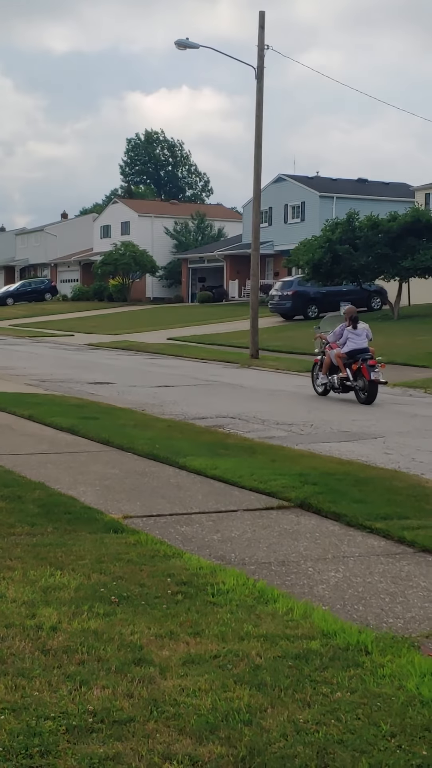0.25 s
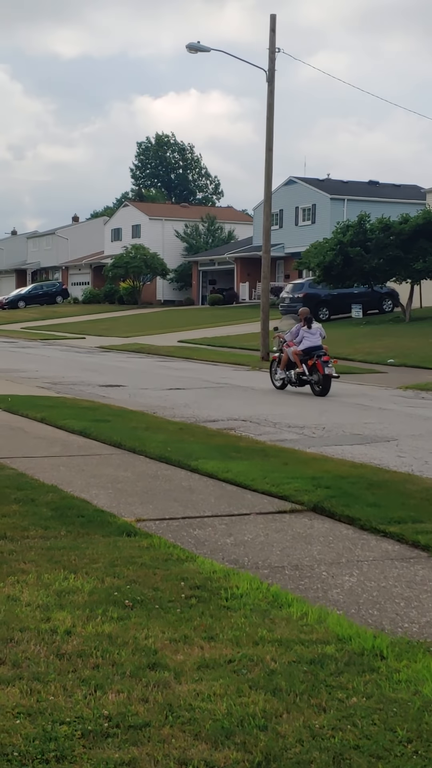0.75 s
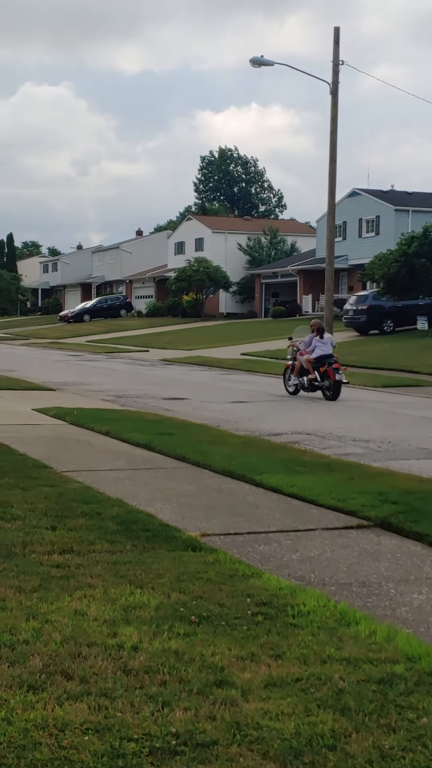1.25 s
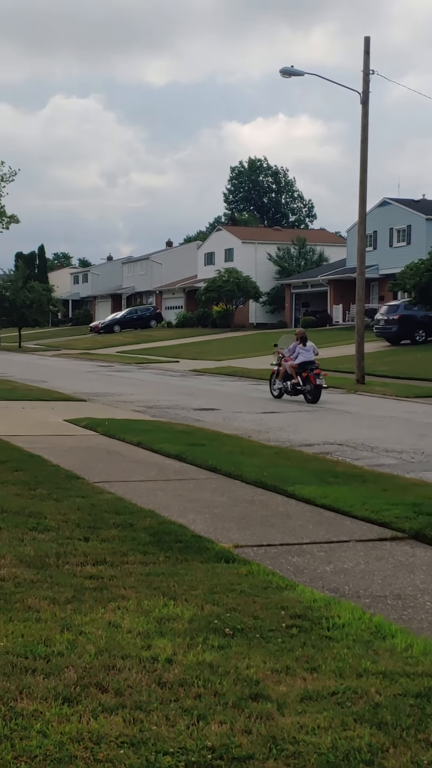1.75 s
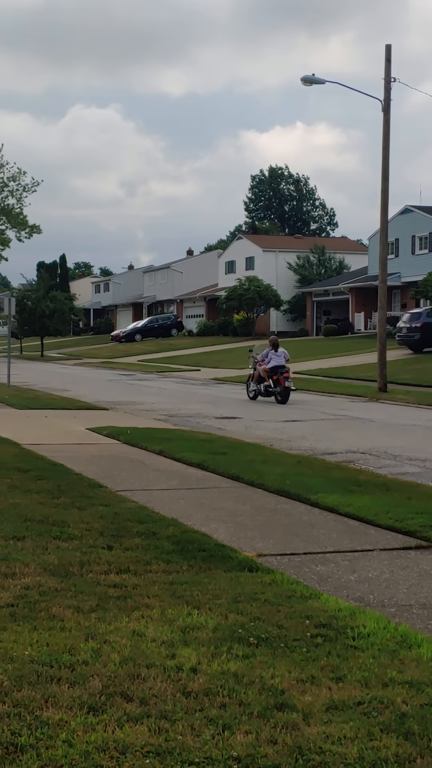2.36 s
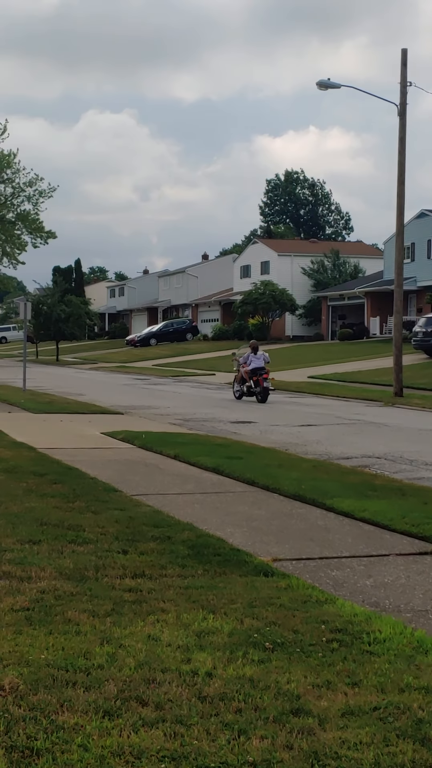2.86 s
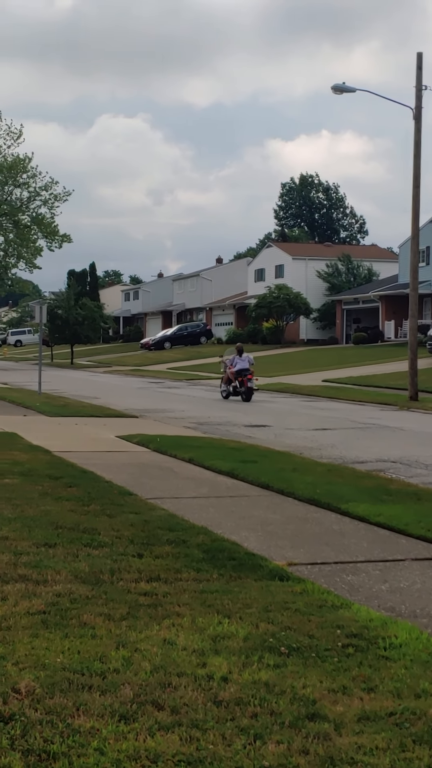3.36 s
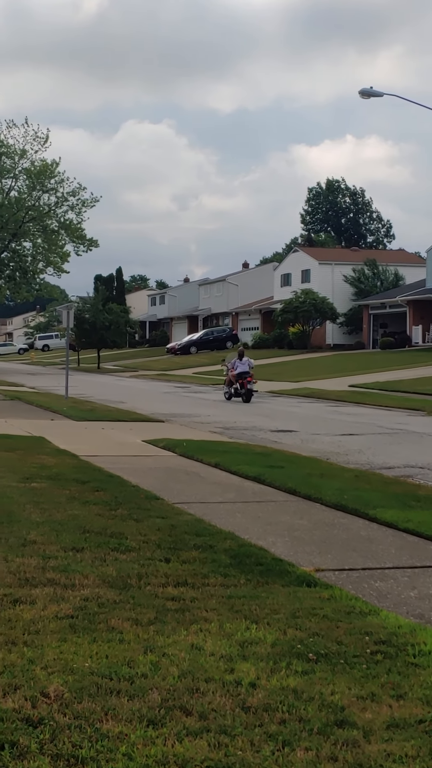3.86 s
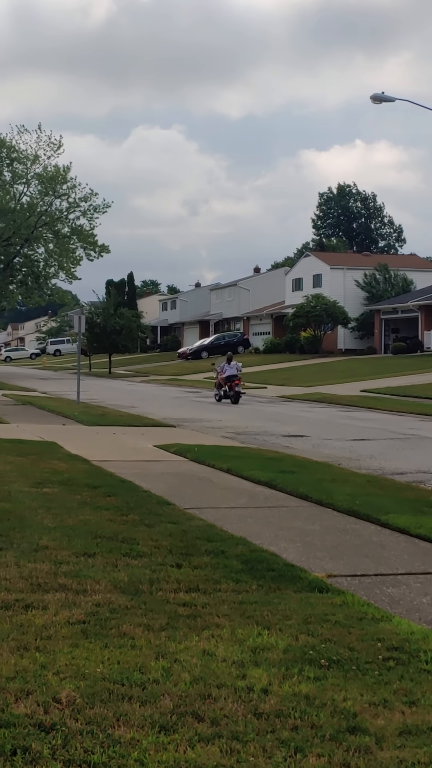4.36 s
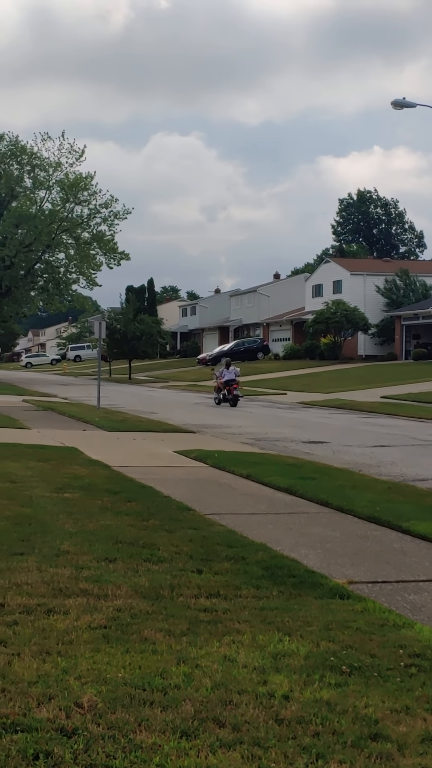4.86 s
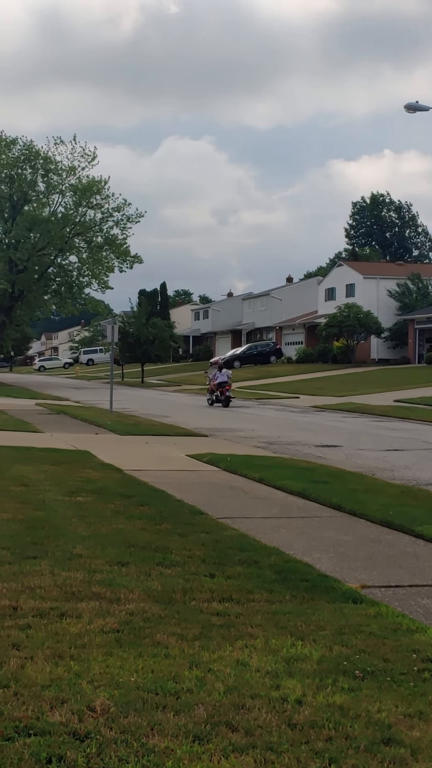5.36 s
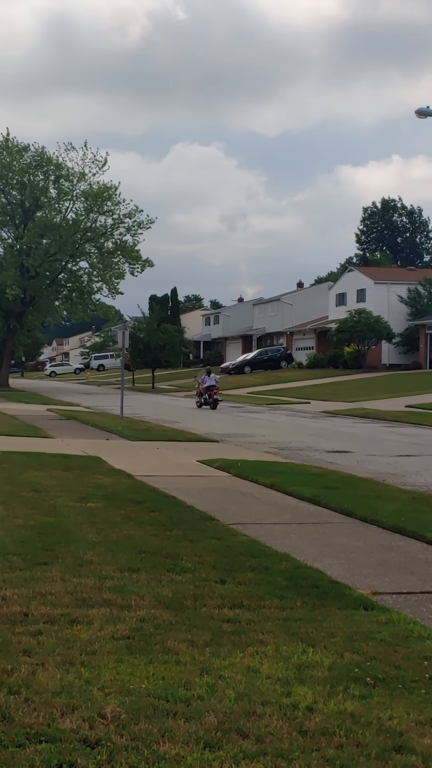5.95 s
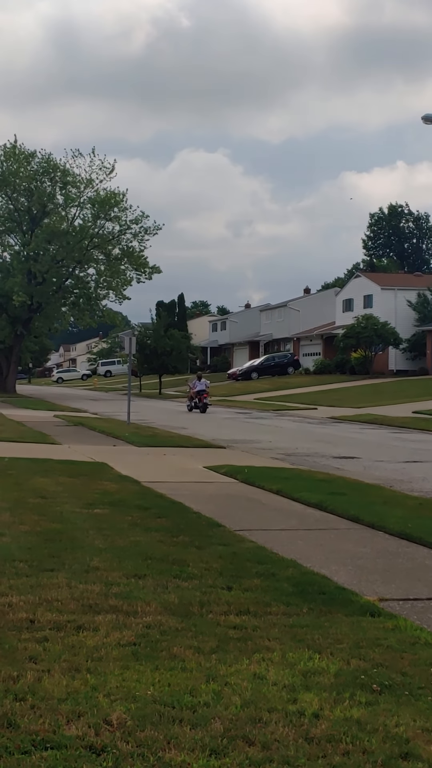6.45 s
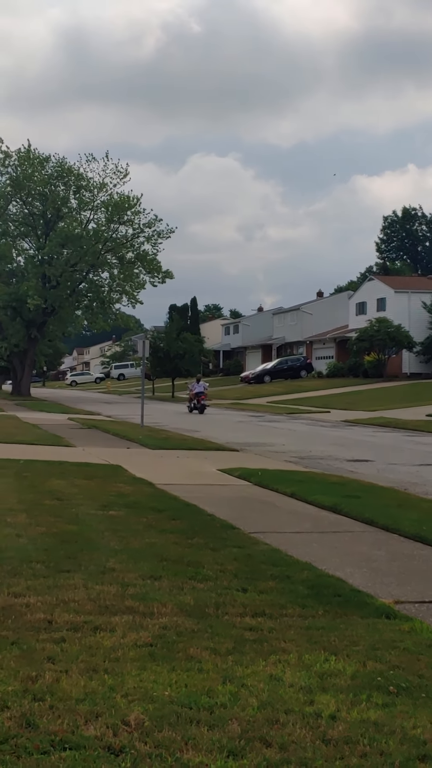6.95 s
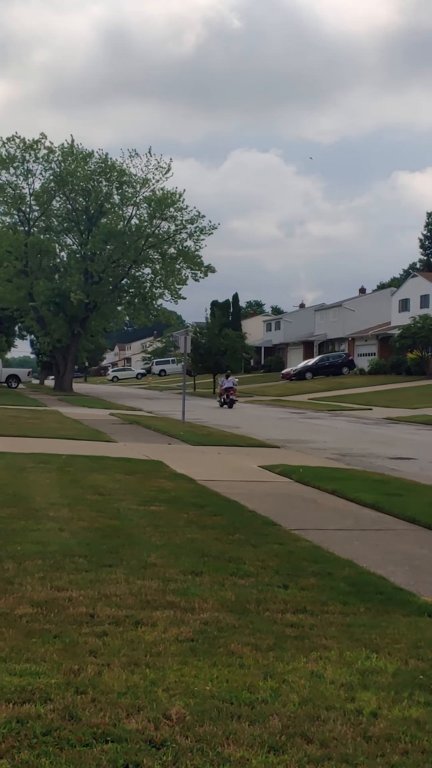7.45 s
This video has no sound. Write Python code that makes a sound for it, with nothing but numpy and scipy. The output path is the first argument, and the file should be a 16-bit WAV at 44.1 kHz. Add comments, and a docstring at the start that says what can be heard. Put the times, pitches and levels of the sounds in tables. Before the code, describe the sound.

A big twin-cylinder motorcycle chugs away down a suburban street, its uneven thump echoing off houses while wind buffets and slaps the microphone.

```python
"""A V-twin motorcycle chugs away down a quiet street: two uneven firings a cycle excite decaying pipe modes,
and bursts of gas noise crack at the pipe mouths. Two house fronts return delayed, dulled copies with
shrinking lags, and scattered late reflections form a noise-built tail. Wind buffets two microphone ports,
mostly the left: shaped noise rumbles and flutters, single slaps are short falling tones. Tyres, engine
whir and town hiss as flickering bands of noise; a few far birds chirp as bent whistles."""
import sys
import numpy as np
from scipy import signal
from scipy.fft import rfft, irfft
from scipy.io import wavfile
from scipy.ndimage import uniform_filter1d

SR = 44100
rng = np.random.default_rng(int(sys.argv[2]) if len(sys.argv) > 2 else 0)


def file_out(sig):
    """Save sig as 16-bit WAV at sys.argv[1]."""
    # one column per channel
    cols = np.atleast_2d(sig).T
    # limit, then scale
    lim = np.clip(cols, -1, 1)
    pcm = np.round(lim * 32767).astype(np.int16)
    wavfile.write(sys.argv[1], SR, pcm)


N = 340011

# Four-stroke cycle rate as heard: t/s, rate/(cycles/s)
CYCLE_RATE = [(0, 10.42), (.3, 10.441), (1.1, 10.785), (2.3, 10.924), (2.6, 10.858), (4, 10.881),
              (4.2, 10.968), (4.9, 11.005), (5.35, 11.169), (5.5, 10.917), (6.7, 10.656), (7.71, 10.568)]
# Engine load: t/s, throttle/(0 to 1), swell of the crack/dB
THROTTLE = [(0, 0.44, -4.5), (.6, 0.32, -1), (1.5, 0.56, 4), (2.1, 0.46, 1.5), (2.5, 0.51, 6),
            (3.4, 0.44, -1.5), (4, 0.73, 6.5), (4.5, 0.91, 4.5), (5.1, 0.85, 1.5), (5.5, 0.66, 5.5),
            (6, 0.57, 1), (6.5, 0.54, 7), (7, 0.39, -0.5), (7.71, 0.83, 4.5)]
# Pipe modes: firing place/cycle, f/Hz, t60/s, relative push (negative where the wave leaves as a dip)
PIPE_MODES = [(-.035, 104.3, .35, -.4), (-.031, 168.6, .075, 1.76), (-.048, 188.8, .105, 1.2),
              (0, 62, .13, .9), (-.018, 326, .037, -.63), (-.016, 245, .126, .17), (.554, 82, .079, -3.1),
              (.551, 196.6, .21, .35), (.545, 56.7, .033, 4.8), (.546, 283.5, .051, -.52),
              (.565, 217, .065, -.6)]
# Gas puffs at the pipe mouths: place/cycle, relative level/dB, decay constant/ms, cutoff f/Hz
GAS_PUFFS = [(-.014, -1, 2.2, 14000), (0, -3, 4.5, 2500), (.04, -12.5, 4, 7000), (.12, -17, 5, 7000),
             (.39, -20, 6, 9000), (.582, -7, 3, 4500), (.73, -11, 3, 4000), (.88, -19, 4, 4000)]
# Colour of the crack: f/Hz, relative level/dB
CRACK_COLOUR = [(300, -15.5), (900, -1), (1600, -15.5), (2470, -11), (3300, -16.5), (5000, -10),
                (6500, -16), (8000, -22.5), (10700, -27.5), (12400, -34)]
# Colour of the thump: f/Hz, gain/dB
THUMP_COLOUR = [(22, -34), (34, -11), (46, 3), (210, -2), (300, -5), (370, -5), (430, -16), (700, -37),
                (1500, -71.5)]
# Bands of the crack: tilt/(share of the treble fade), lower f/Hz, upper f/Hz
CRACK_BANDS = [(-.3, 950, 1900), (-.7, 1900, 3000), (-.1, 3000, 4400), (.5, 4400, 6800), (1, 6800, 15000)]
# House fronts: t/s, far lag/ms, far level/dB, near lag/ms, near level/dB
HOUSE_FRONTS = [(0, 94, -24, 53, -26), (.9, 87.5, -17, 49, -22), (1.4, 84, -8, 47, -22),
                (1.8, 82.3, -3.5, 45, -20), (2.3, 79, -1.5, 42, -18), (2.8, 76, -1, 39, -16),
                (3.8, 73.5, -3, 38, -10), (5.2, 70, -5, 34.1, -10), (7.1, 66, -9, 28, -12),
                (7.7, 64, -9, 27, -12)]
# Dulling by walls and shrubs: f/Hz, gain/dB
FRONT_COLOUR = [(220, 0), (350, -6), (800, -11), (2500, -8), (10000, -16)]
# Colour of the late reflections: f/Hz, relative level/dB
TAIL_COLOUR = [(60, -6.5), (250, -1.5), (500, 7.5), (900, 6.5), (2500, 4.0), (12000, -14.0)]
# Colour of the hiss: f/Hz, relative level/dB
HISS_COLOUR = [(250, -6), (450, -9.5), (680, -12.5), (850, -12.5), (1300, -17.5), (1800, -19),
               (2400, -24.5), (3100, -31.5), (4000, -24.5), (5000, -30.5), (5800, -40), (6600, -28.5),
               (7700, -52), (9000, -45.5), (11000, -47.5), (12400, -53.5)]
# Wind rumble at the left port, before the buffets: t/s, level/dB
WIND_LEFT = [(0, -20.5), (.8, -32), (1.25, -45), (1.55, -28.5), (1.95, -33), (2.2, -43), (2.65, -36),
             (2.85, -20), (3.7, -16.5), (4.6, -22.5), (5.3, -24), (5.45, -20.5), (5.9, -11.5), (6.6, -14.5),
             (6.74, -16), (6.78, -30), (7.1, -39), (7.55, -24.5), (7.71, -32)]
# Wind rumble at the right port: t/s, level/dB
WIND_RIGHT = [(0, -33), (1, -52), (2.6, -42), (2.95, -26), (3.15, -11.5), (3.35, -21.5), (3.6, -26.5),
              (3.9, -16), (4.25, -23), (4.6, -23), (5.3, -29.5), (5.55, -22), (5.9, -28), (6.3, -15),
              (6.75, -18), (7, -28), (7.5, -29), (7.71, -38)]
# Buffets that swell the left rumble: start t/s, peak level/dB, hold/s
BUFFETS = [(2.874, -13.5, 0.045), (3.09, -15.5, 0.11), (3.582, -11, 0.13), (3.727, -10, 0.066),
           (4.051, -8, 0.032), (4.851, -11, 0.024), (5.388, -15.5, 0.11), (5.737, -15, 0.13),
           (5.991, -14, 0.12), (6.266, -21, 0.085), (6.436, -14, 0.064), (6.627, -8, 0.09)]
# Eddies that slap a port: t/s, peak level/dB, time scale/ms, starting f/Hz, port (0 left, 1 right)
SLAPS = [(3.012, -14.5, 14, 203, 1), (3.127, -11, 16, 150, 0), (3.13, -10, 12, 120, 1),
         (3.169, -6, 9.1, 85, 0), (3.33, -13, 9.7, 110, 1), (3.413, -3.5, 13.5, 100, 0),
         (3.432, -9, 6.7, 262, 0), (3.585, -11.5, 6, 220, 0), (3.611, -10, 7.4, 230, 0),
         (3.622, -5, 8.3, 75, 0), (3.654, 0, 10.3, 90, 0), (3.698, -7, 12, 120, 0),
         (3.764, -2.5, 15, 75, 0), (3.946, -1.5, 13.3, 85, 0), (4.057, -14, 12, 90, 0),
         (4.088, -5.5, 15, 130, 0), (4.292, -9, 10.3, 170, 0), (4.428, -1.5, 15, 70, 0),
         (4.867, -10, 20, 130, 0), (5.682, -4, 6.8, 190, 0), (5.712, -1.5, 15, 65, 0),
         (5.755, 0, 6.7, 210, 0), (5.782, -3, 9.2, 260, 0), (5.824, -8, 7.2, 180, 0),
         (5.855, -9.5, 8.4, 300, 0), (5.866, -2.5, 8.8, 260, 0), (5.892, -12.5, 10, 230, 0),
         (5.933, -5.5, 10, 260, 0), (6.005, -11, 2.8, 350, 0), (6.013, -0.5, 17, 75, 0),
         (6.031, -5.5, 5, 260, 0), (6.214, -6.5, 5.7, 200, 0), (6.19, -2, 11, 85, 0),
         (6.261, 2.5, 11.6, 260, 0), (6.302, -8.5, 9.4, 230, 0), (6.315, -11, 10, 100, 0),
         (6.357, -7, 7.7, 180, 0), (6.4, -12.5, 4.9, 300, 0), (6.448, -3, 6.9, 85, 0),
         (6.618, 1.5, 10.8, 230, 0), (6.637, -6.5, 10.8, 240, 0), (6.659, -1, 4.2, 250, 0),
         (6.667, 6, 19, 75, 0), (6.7, -10, 13, 301, 0), (6.714, -7.5, 5, 230, 1),
         (6.734, -14.5, 5.2, 230, 1), (7.652, -7, 23, 55, 0), (7.661, -14, 0.35, 230, 0)]
# Colour of the rumble: f/Hz, relative level/dB
RUMBLE_COLOUR = [(18, -33.0), (32, 7.5), (52, 11.5), (90, 10.0), (140, 7.5), (220, -14.5), (400, -59.0),
                 (1000, -120)]
# Colour of the flutter: f/Hz, relative level/dB
FLUTTER_COLOUR = [(100, -29), (190, 4.0), (350, -6.0), (600, -26.5), (1000, -51.5), (2000, -71), (4000, -130)]
# Bird chirps: t/s, length/s, start f/Hz, middle f/Hz, end f/Hz, level/dB
CHIRPS = [(1.462, .03, 4700, 3900, 3400, -55), (1.565, .03, 3700, 3650, 3600, -58),
          (1.884, .016, 4300, 4400, 4550, -58), (1.912, .027, 3750, 3700, 3650, -54),
          (1.94, .02, 3800, 3950, 3650, -56), (1.962, .04, 2850, 3050, 2450, -55),
          (1.975, .022, 3700, 3800, 3850, -57), (1.988, .036, 4600, 6000, 4600, -56),
          (2.80, .042, 3300, 3300, 2850, -57), (3.178, .03, 3500, 3750, 3600, -58),
          (3.213, .047, 4600, 6100, 3800, -56), (3.24, .04, 3100, 2900, 2750, -58),
          (3.31, .034, 3400, 3900, 3700, -59), (4.54, .038, 3550, 3650, 3600, -57),
          (4.572, .022, 4550, 4600, 4650, -59), (4.594, .018, 3500, 3650, 3800, -54),
          (4.612, .038, 3150, 3250, 2800, -50), (4.644, .014, 4050, 4200, 4450, -57),
          (4.675, .025, 3150, 3200, 3100, -59), (7.183, .033, 4200, 4050, 3400, -52.5),
          (7.238, .02, 3100, 3000, 2950, -58), (7.52, .04, 5700, 6300, 4600, -52.5)]
# Likeness of wide noise at the two ears: f/Hz, left-right correlation
LIKENESS = [(200, 1), (600, 0.9), (1200, 0.72), (2600, 0.62), (5600, 0.6), (9000, .65), (12000, 0.85)]
# Phase between the ports: f/Hz, lead of the left port/rad
PORT_LEAD = [(200, 0), (860, -.4), (3000, 0), (3700, -1.4), (6400, -.9), (7000, -.4), (9900, -1.2),
             (12000, -.2)]
# Level between the ports: f/Hz, left minus right level/dB
PORT_DIFFERENCE = [(100, -0.55), (350, 1), (700, -0.5), (1100, -3), (2000, 2), (4000, -1), (12000, -1)]

FIRST_CYCLE = -.85  # place in the cycle at the start
START_M, SPEED_M_S = 20, 6.62
THUMP_DB, MOUTH_DB = -18.5, -48.5  # at the start, throttle shut
THUMP_OPEN_DB, MOUTH_OPEN_DB = 3.5, 15.5  # gained at full throttle
CRACK_DB = -51  # at the start, before its swell
DULLING, BODY_HZ = 0.18, 156  # extra fall above BODY_HZ, as a share of the fall with distance
MOUTH_HZ, MOUTH_SAG_HZ_PER_S, MOUTH_T60_S = 860, 6, .02
HISS_DB, HISS_FADE = -41, 0.35  # at the start; share of the bike's fall in level
BUFFET_RISE_S, BUFFET_FALL_S = 0.0054, 0.018
RUMBLE_LUMP_DB = 1.3
FLUTTER_DB, FLUTTER_GROWTH = -29.5, 1.34  # at a rumble of -14.5 dB; dB per dB of rumble
SLAP_SAG, SLAP_WOBBLE = 0.17, 0.27  # decay rate of the pitch per time scale; its relative random wander
BIRD_ECHO_S, BIRD_ECHO_DB = .007, -6  # off a wall near the birds
TOP_HZ = 12500


def undb(db):
    """Level in dB to amplitude ratio."""
    return 10 ** (np.asarray(db) / 20)


def unit(x):
    """Normalise to an rms amplitude of 1."""
    return x / np.sqrt(np.mean(x ** 2))


def curves(table):
    """Linear interpolation in time of every column of a table."""
    s, *columns = np.transpose(table)
    return [np.interp(np.arange(N) / SR, s, c) for c in columns]


def over_hz(table):
    """Interpolation of an (f/Hz, value) table on the FFT bins, straight on a log-frequency axis."""
    hz, value = np.transpose(table)
    return np.interp(np.log(np.arange(N // 2 + 1) * SR / N + 1), np.log(hz + 1), value)


def colour(x, table):
    """Zero-phase filtering: each spectral bin is scaled by an (f/Hz, gain/dB) table."""
    return irfft(rfft(x) * undb(over_hz(table)), N)


def decay(x, time_s):
    """Exponential relaxation: every input falls by a factor e in time_s."""
    return signal.lfilter([1], [1, -np.exp(-1 / time_s / SR)], x)


def ring(x, hz, t60):
    """Damped resonance: one mode decays 60 dB in t60 seconds, and its pitch may drift."""
    turn = np.exp(2j * np.pi * np.cumsum(hz * np.ones(N)) / SR)
    return (turn * decay(x / turn, t60 / np.log(1000))).imag


def band(x, lo_hz, hi_hz, order=2):
    """Band-pass filtering between two cutoff frequencies."""
    return signal.sosfilt(signal.butter(order, [lo_hz, hi_hz], "band", fs=SR, output="sos"), x)


def walk(rate):
    """Random modulation: independent levels held 1 / rate s, then slewed; spread near 1."""
    k = int(SR / rate)
    held = np.repeat(rng.standard_normal(N // k + 1), k)
    return 2.32 * uniform_filter1d(held, k)[:N]


def wide_noise():
    """Partial coherence: mid and side noises mix so that left and right correlate as LIKENESS states."""
    c = np.clip(over_hz(LIKENESS), 0, 1)
    mid, side = rfft(rng.standard_normal((2, N)))
    pair = np.sqrt(1 + c) * mid + np.sqrt(1 - c) * side * np.array([[1], [-1]])
    return irfft(pair, N) / np.sqrt(2)


def strokes(place, scatter_db, scatter_ms):
    """Periodic excitation: a click at one place of every cycle, each a little different in size and time."""
    done, s = FIRST_CYCLE + np.cumsum(curves(CYCLE_RATE)[0]) / SR, np.arange(N) / SR
    cycle = np.arange(np.floor(done[0]), done[-1]) + place
    chance = rng.standard_normal((len(cycle), 2))
    when_s = np.interp(cycle, done, s, -1, -1) + chance[:, 0] * scatter_ms / 1000
    at = (when_s * SR).astype(int)
    keep = (at >= 0) & (at < N)
    out = np.zeros(N)
    out[at[keep]] = undb(scatter_db * chance[keep, 1])
    return out


def distance_db():
    """Spherical spreading: amplitude falls as the inverse of distance while the bike rides away."""
    return -20 * np.log10(1 + SPEED_M_S * np.arange(N) / SR / START_M)


def pipe_thump():
    """Modal excitation: each firing pushes decaying pipe modes; their upper part fades more with distance."""
    thump = sum(push * ring(strokes(place, .4, .04), hz, t60) for place, hz, t60, push in PIPE_MODES)
    thump = colour(thump, THUMP_COLOUR)
    upper = signal.lfilter(*signal.butter(1, BODY_HZ, 'high', fs=SR), thump)
    return thump + (undb(DULLING * distance_db()) - 1) * upper


def gas_bursts():
    """Jet noise: every puff gates low-passed noise with a decaying envelope; the bare clicks come along."""
    noise, gas, knock = wide_noise(), 0, 0
    for place, db, ms, top_hz in GAS_PUFFS:
        blow = undb(db) * strokes(place, .8, .35)
        gate = uniform_filter1d(decay(blow, ms / 1000), size=50)
        gas = gas + signal.lfilter(*signal.butter(2, top_hz, fs=SR), gate * noise)
        knock = knock + blow
    return gas, knock


def gas_crack(gas):
    """Turbulent colouring: the bands of the gas noise flicker; air takes more treble as the bike recedes."""
    crack = colour(gas, CRACK_COLOUR)
    crack = crack / np.std(band(crack, 2470, 10950))
    top_fade_db = np.linspace(3.1, -3.1, N)
    out = 0
    for k, (tilt, lo, hi) in enumerate(CRACK_BANDS):
        gain = undb(1.3 * walk(45) + tilt * top_fade_db)
        out = out + gain * (-1) ** k * band(crack, lo, hi)  # alternate signs join neighbouring bands
    return out


def mouth_ring(gas, knock):
    """Resonance of the pipe mouth: knocked the same way by each blow, rung at random by the gas."""
    push = band(unit(knock) + .15 * unit(gas), 500, 1400)
    return ring(push, MOUTH_HZ - MOUTH_SAG_HZ_PER_S * np.arange(N) / SR, MOUTH_T60_S)


def motorcycle():
    """Superposition of pipe thump, gas crack and mouth ring, driven by throttle and reduced by distance."""
    throttle, crack_db = curves(THROTTLE)
    thump = undb(THUMP_DB + THUMP_OPEN_DB * throttle) * unit(pipe_thump())
    gas, knock = gas_bursts()
    crack = undb(CRACK_DB + crack_db) * gas_crack(gas)
    mouth = undb(MOUTH_DB + MOUTH_OPEN_DB * throttle) * unit(mouth_ring(gas, knock))
    return undb(distance_db()) * (thump + crack + mouth)


def house_fronts(bike):
    """Specular reflection: two dulled echoes whose lags shrink as the street lines up behind the bike."""
    far_ms, far_db, near_ms, near_db = curves(HOUSE_FRONTS)
    dull = colour(bike, FRONT_COLOUR)
    i = np.arange(N)
    out = 0
    for ms, db in ((far_ms, far_db), (near_ms, near_db)):
        echo = np.array([np.interp(i - ms * SR / 1000, i, ear, 0) for ear in dull])
        out = out + undb(db) * echo
    return out


def street_tail(bike):
    """Diffuse reflection: convolution with decaying noise stands for scattered late arrivals."""
    t = np.arange(SR // 2) / SR
    envelope = np.exp(-np.log(1000) * t / 1.0) * np.minimum(t / 0.012, 1)  # t60 of 1 s, 12 ms onset
    tail = colour(wide_noise(), TAIL_COLOUR)[:, :len(t)] * envelope
    tail = tail / np.sqrt(np.sum(tail ** 2) / 2)
    return undb(-17.5) * signal.fftconvolve(bike, tail, axes=1)[:, :N]


def street_hiss():
    """Broadband noise of tyres, engine whir and town: octave bands that flicker a little."""
    noise = colour(wide_noise(), HISS_COLOUR)
    bands = 0
    for k, lo in enumerate(150 * 2. ** np.arange(7)):
        flicker = undb(.3 * walk(2.5) + .7 * walk(14))
        bands = bands + flicker * (-1) ** k * band(noise, lo, 2 * lo)
    return undb(HISS_DB + HISS_FADE * distance_db()) * unit(bands)


def port_turbulence(db):
    """Boundary turbulence at one port: a lumpy rumble, and a flutter in short bursts that grows faster."""
    lumps = walk(30)
    rumble = colour(rng.standard_normal(N), RUMBLE_COLOUR)
    eddies = colour(rng.standard_normal(N), FLUTTER_COLOUR)
    rumble = unit(rumble * undb(RUMBLE_LUMP_DB * lumps))
    flutter = unit(eddies * undb(2. * lumps + 3 * walk(70)))
    return undb(db) * rumble + undb(FLUTTER_DB + FLUTTER_GROWTH * (db + 14.5)) * flutter


def eddy_slap(ms, hz):
    """Transient pressure of one eddy: a brief tone of falling, wandering pitch, scaled to a peak of 1."""
    t = np.arange(SR // 12) / SR
    u = t * 1000 / ms
    wander = SLAP_WOBBLE * np.repeat(rng.standard_normal(len(t) // 128 + 1), 128)[:len(t)]
    phase = 2 * np.pi * hz * np.cumsum(np.exp(-SLAP_SAG * u) + wander) / SR
    envelope = np.minimum(u / 0.24, 1) * np.exp(-(u / 1.48) ** 3)
    slap = band(envelope * (np.sin(phase) + 0.15 * np.sin(2.3 * phase)), 30, 750)
    return slap / np.abs(slap).max()


def wind():
    """Incoherent turbulence: each port has its own noise and slaps; buffets swell the left one."""
    now = np.arange(N) / SR
    swells = 0
    for s, db, hold in BUFFETS:
        corners = np.cumsum([s, BUFFET_RISE_S, hold, BUFFET_FALL_S])
        swells = swells + undb(db) * np.interp(now, corners, [0, 1, 1, 0])
    left_db = 20 * np.log10(np.hypot(undb(curves(WIND_LEFT)[0]), swells))
    out = np.array([port_turbulence(db) for db in (left_db, curves(WIND_RIGHT)[0])])
    for s, db, ms, hz, port in SLAPS:
        slap = undb(db) * eddy_slap(ms, hz)
        i = int(s * SR)
        out[int(port > .5), i:i + len(slap)] += slap[:N - i]
    return out


def birds():
    """Frequency modulation: short ragged whistles bend through three pitches, each with one wall echo."""
    out, ragged = np.zeros(N), walk(260)
    for s, length, hz0, hz1, hz2, db in CHIRPS:
        u = np.linspace(0, 1, int(length * SR))
        i = int(s * SR)
        here = slice(i, i + len(u))
        hz = uniform_filter1d(np.interp(u, [0, .5, 1], [hz0, hz1, hz2]), len(u) // 3)
        hz = hz * (1 + .012 * ragged[::-1][here])
        envelope = undb(db + 2.2 * ragged[here]) * np.sqrt(np.sin(np.pi * u) + 1e-9)
        out[here] += envelope * np.sin(2 * np.pi * np.cumsum(hz) / SR)
    return out + undb(BIRD_ECHO_DB) * np.roll(out, int(BIRD_ECHO_S * SR))


def scene():
    """Diffraction at the microphone's body shifts far sounds between the ports; wind is born at the ports."""
    bike = motorcycle()
    air = bike + house_fronts(bike) + street_tail(bike) + street_hiss() + birds()
    half = undb(over_hz(PORT_DIFFERENCE) / 2) * np.exp(.5j * over_hz(PORT_LEAD))
    ends = np.linspace(air[:, 0], air[:, -1], N).T  # keeps the filter from joining the end to the start
    far = irfft(rfft(air - ends) * np.array([half, 1 / half]), N) + ends
    return far + wind()


def record(dry):
    """Dynamic compression: gain falls when the smoothed power is high, peaks are rounded, the top is cut."""
    a = 1 / (.06 * SR)  # 60 ms smoothing
    loudest = np.max(dry ** 2, axis=0)
    power = signal.lfilter([a], [1, a - 1], loudest, zi=[undb(-17) ** 2])[0]
    x = np.maximum(power / undb(-14.0) ** 2, 1) ** -.15 * dry
    x = x / (1 + x ** 6) ** (1 / 6)
    start = x[:, :1]  # the filter begins settled on the first sample
    top_cut = signal.ellip(8, .2, 40, TOP_HZ, fs=SR, output="sos")
    return start + signal.sosfilt(top_cut, x - start)


dry = scene()
out = record(dry)
file_out(out)
```